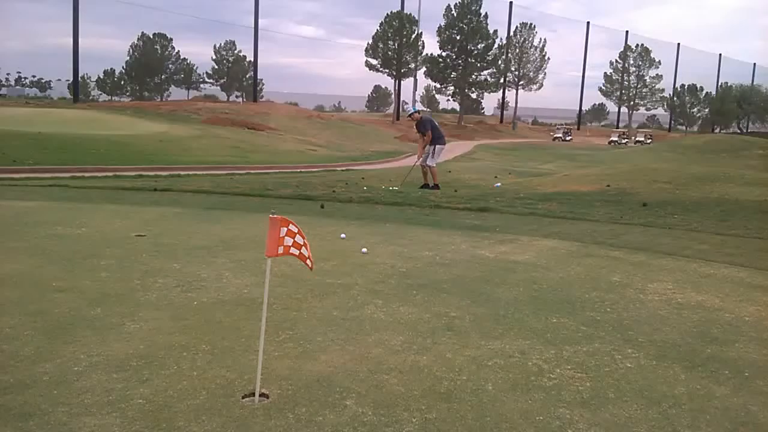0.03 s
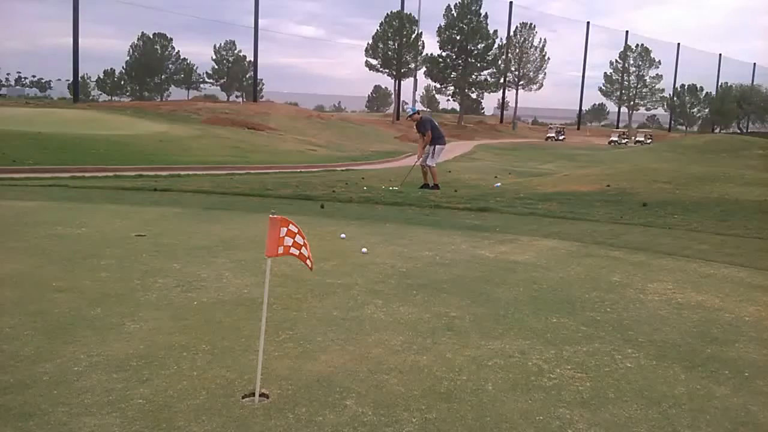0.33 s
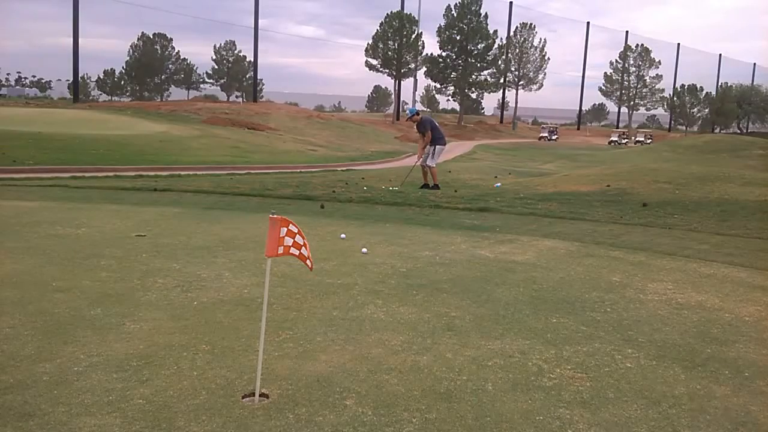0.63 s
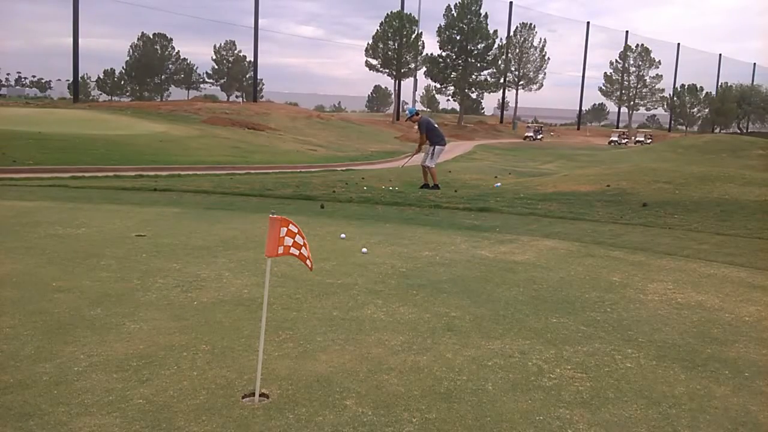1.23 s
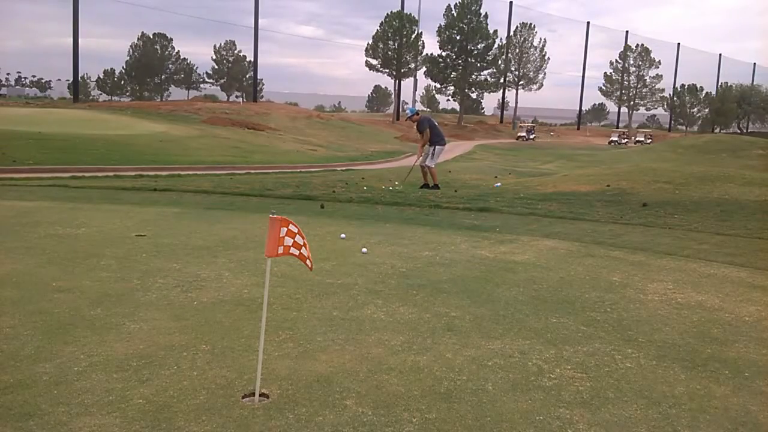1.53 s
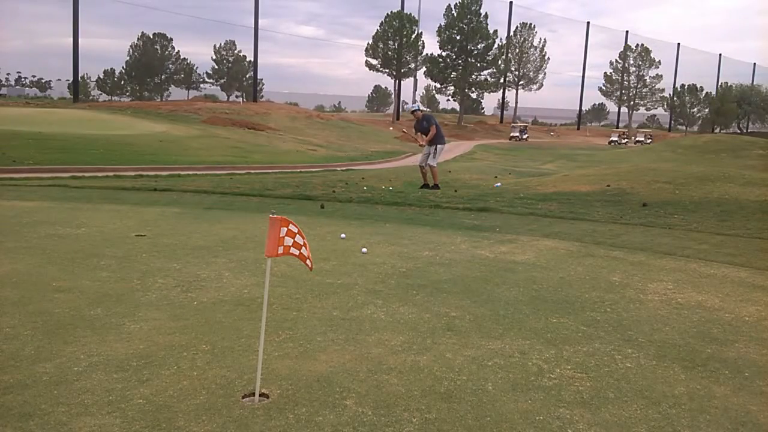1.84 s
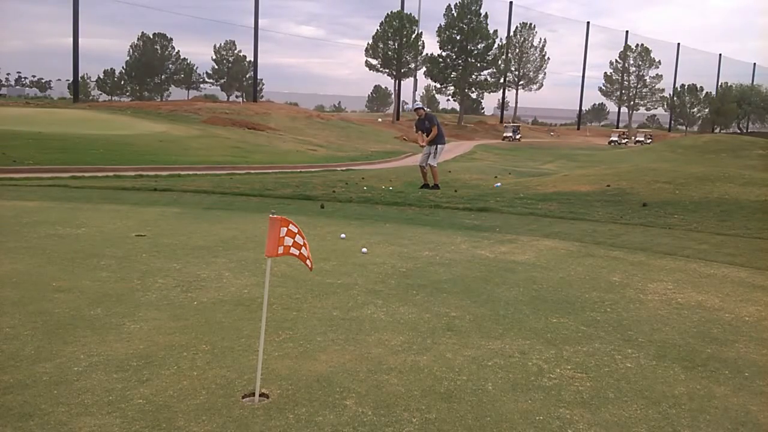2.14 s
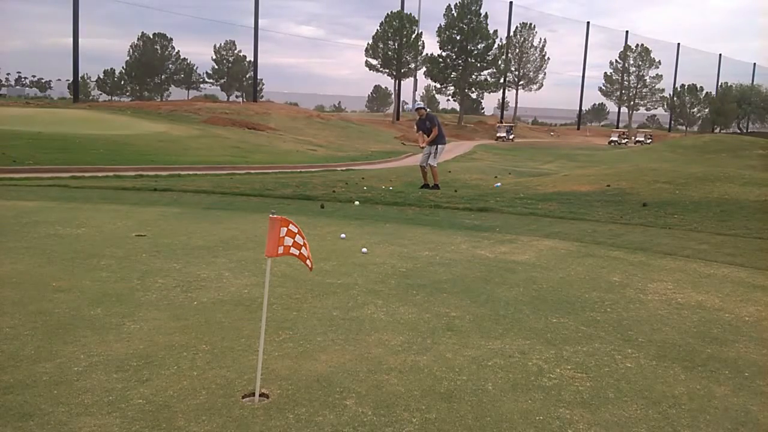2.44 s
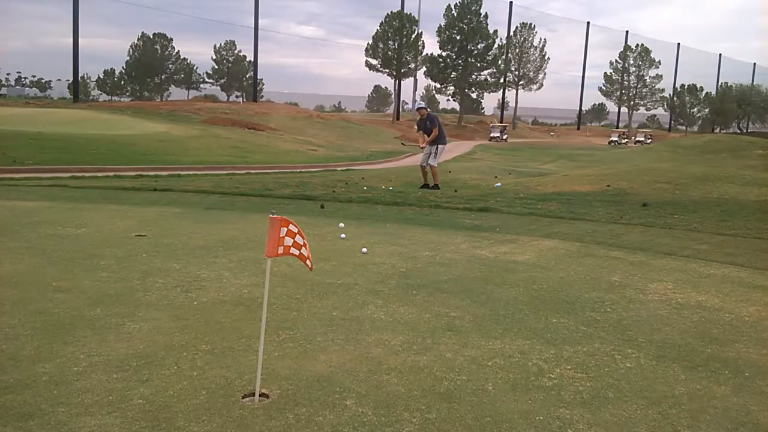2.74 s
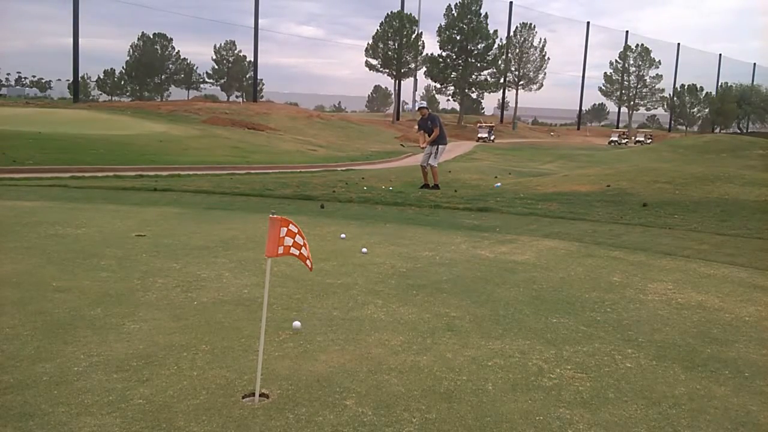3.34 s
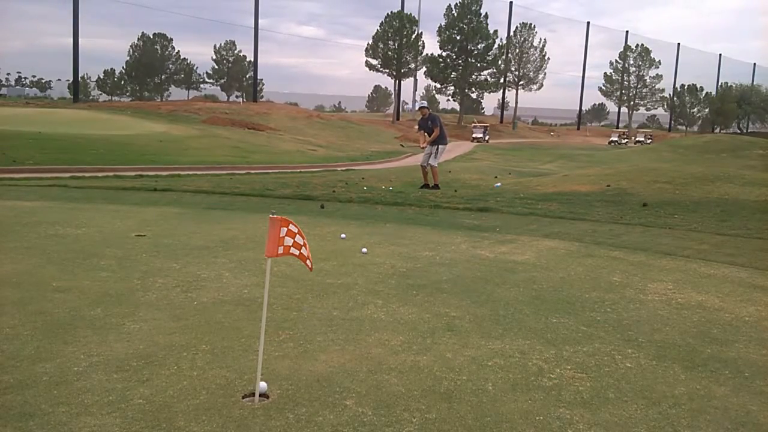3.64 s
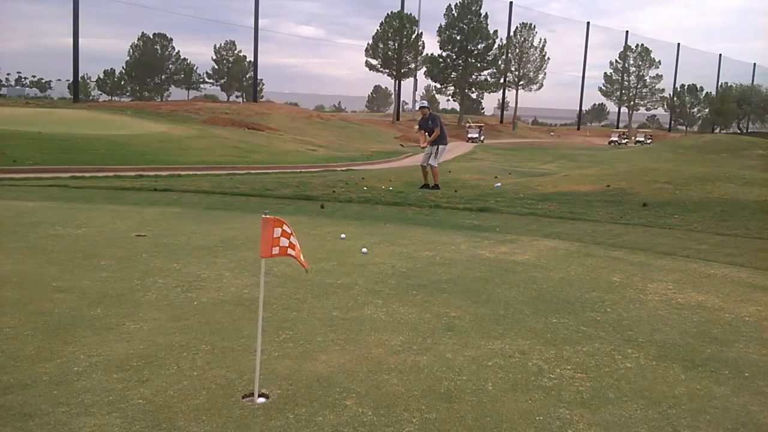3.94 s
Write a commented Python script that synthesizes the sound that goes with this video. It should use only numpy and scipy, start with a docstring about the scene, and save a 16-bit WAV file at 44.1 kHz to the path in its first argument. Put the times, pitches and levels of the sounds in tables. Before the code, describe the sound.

A golf ball hitting the flagstick and dropping into the hole ends a quiet outdoor stretch. First come light wind on the microphone, a far hush and a distant chip, then the close, briefly ringing rattle.

```python
"""A chip shot on a quiet golf course. Soft wind buffets the microphone throughout, growing a little,
over the even hush of far traffic and trees. At 1.63 s the club clicks on the ball, far off. A faint
tone and two swells of the hush follow. At 3.78 s the ball strikes the flagstick close by, rattles
between stick and rim, ringing both, and at 3.9 s drops into the cup, where turf dulls the treble."""
import sys
import numpy as np
from scipy import signal
from scipy.fft import rfft, irfft
from scipy.io import wavfile
from scipy.ndimage import uniform_filter1d

SR = 44100
rng = np.random.default_rng(int(sys.argv[2]) if len(sys.argv) > 2 else 0)


def unload_audio(sound):
    """Save the sound as a 16-bit wav file, at the path given as the first command line argument."""
    columns = np.transpose(np.atleast_2d(sound))
    # keep every value between -1 and 1, then stretch to whole-number steps
    steps = np.round(np.clip(columns, -1, 1) * 32767)
    wavfile.write(sys.argv[1], SR, steps.astype(np.int16))


N = 176400

# wind rumble spectrum: f/Hz, relative density/dB
RUMBLE_SPECTRUM = [(15, -37.5), (28, -9.5), (62, 2), (120, 1), (200, -8), (290, -18), (420, -29),
                   (700, -46.5), (2000, -83.5)]
# wind rumble envelope: t/s, level/dB
WIND_LEVELS = [(.1, -40), (.36, -36), (.62, -38), (.74, -34), (.8, -35), (.88, -32.5), (1.0, -37.5),
               (1.33, -36), (1.55, -40), (1.8, -36), (2.15, -33.5), (2.28, -34), (2.45, -36.5), (3.0, -32),
               (3.35, -30), (3.62, -34), (3.95, -28)]
# eddies on the microphone: t/s, relative level/dB, centre f/Hz
EDDY_THUMPS = [(0.245, -23.5, 212), (0.731, -22, 128), (0.741, -24.5, 117), (0.868, -23.5, 81),
               (0.882, -18.5, 81), (0.899, -21, 145), (1.094, -24, 130), (1.303, -30, 197),
               (1.334, -27, 93.5), (1.396, -25, 145), (1.701, -23.5, 95), (1.83, -21, 148),
               (1.863, -24, 121), (2.011, -21.5, 99), (2.292, -22.5, 106), (2.609, -26, 274),
               (2.667, -21.5, 159), (2.71, -20, 109), (2.763, -29.5, 232), (2.782, -26.5, 160),
               (2.83, -19.5, 162), (2.85, -23.5, 235), (2.88, -26.5, 101), (2.936, -25.5, 190),
               (2.955, -19.5, 90), (2.995, -18.5, 88), (3.025, -20.5, 128), (3.041, -23.5, 140),
               (3.083, -21, 202), (3.211, -24.5, 130), (3.306, -16.5, 146), (3.328, -16.5, 173),
               (3.333, -10.5, 203), (3.387, -19.5, 187), (3.419, -22.5, 124), (3.464, -14.5, 111),
               (3.542, -23.5, 206), (3.548, -19.5, 225), (3.701, -14, 144), (3.718, -19, 173),
               (3.773, -24, 215), (3.89, -13.5, 105.3), (3.902, -20, 255), (3.929, -15, 147),
               (3.953, -14.5, 185), (3.957, -19, 104)]
# distant hush spectrum: f/Hz, relative density/dB
HUSH_SPECTRUM = [(100, -12.5), (550, -1.5), (1000, 1.5), (1500, -1), (2000, -10.5), (2800, -17),
                 (4000, -19), (5300, -23.5), (7500, -32.5), (15500, -32.5)]
# swells of the hush: t/s, half width/s, level/dB
HUSH_SWELLS = [(2.166, 0.096, -64), (2.556, 0.24, -66.5)]
# club click spectrum: f/Hz, relative density/dB
CHIP_SPECTRUM = [(200, -4), (500, 5), (800, 4), (1700, 1), (2500, -12), (4200, -17), (8500, -31),
                 (10500, -52)]
# faint far tone: t/s, half width/s, f/Hz, level/dB
TONE_SWELL = (1.96, .06, 1453, -66)
# ball against stick and cup: t/s, relative level/dB, hardness as treble gain/dB
BALL_CONTACTS = [(3.7801, 2, -1), (3.7832, -2, 3), (3.7888, 3.5, -12), (3.7958, -7, 5.5),
                 (3.7980, -6.5, 14), (3.8060, -7, 10), (3.8110, -14, 14), (3.8205, -12, 7.5),
                 (3.8308, -6.5, -1.5), (3.8480, -8, -1), (3.9185, -6.5, -21.5), (3.9215, -16, 1),
                 (3.9355, -19.5, 5), (3.9435, -13, -0.5), (3.9505, -12, -10)]
# stick and cup modes: f/Hz, relative level/dB, T60/s
STICK_CUP_MODES = [(757, 2.5, .27), (1102, -4, .25), (1521, -4, .28), (853, -10, .22), (894, -10, .22),
                   (1135, -12, .2), (1546, -9, .2), (503, -7, .2), (720, -5, .08), (1390, -12, .22),
                   (1783, -16, .2), (2050, -15, .2), (2640, -22, .14), (2755, -16, .18), (2815, -17, .2),
                   (3385, -18, .12), (3475, -16, .12), (4385, -21, .11)]
# spectrum of a contact's crack and echo: f/Hz, relative density/dB
CONTACT_SPECTRUM = [(250, -17.5), (500, 1), (750, 1), (1050, -1), (1600, -5), (2000, -11), (2350, -13.5),
                    (2700, -8.5), (3150, -20), (3420, -8.5), (3900, -16), (4600, -17.5), (6200, -35.5),
                    (8700, -38.5), (11800, -55), (15000, -75)]

START_S, TOP_HZ = .072, 15750
FLUTTER_DB, FLUTTER_PER_S = 2.1, 32
EDDY_GAIN_DB, EDDY_WIDTH_CYCLES, EDDY_LOW_HZ = 2, .24, 34.7
HUSH_DB, HUSH_WANDER_DB, SWELL_HZ = -56.5, .25, 2025
CHIP_S, CHIP_GAIN_DB, SCATTER_GAIN_DB, SCATTER_T60_S = 1.6315, -23, -25, .04
RING_GAIN_DB, RING_ATTACK_S, TREBLE_HZ = -40.5, .0006, 2200
CRACK_GAIN_DB, CRACK_T60_S = -30.5, .028
HOLLOW_GAIN_DB, HOLLOW_T60_S, HOLLOW_TOP_HZ = -39.5, .18, 5230  # dense ringing of the hole
DROP_S, TURF_TOP_HZ = 3.9, 5200


def undb(db):
    """Decibels to gain."""
    return 10 ** (np.asarray(db) / 20)


def spectrum_gain(spectrum, size):
    """Gain per bin of a real FFT; (Hz, dB) points interpolated over log frequency."""
    hz, db = np.array(spectrum, float).T
    bin_hz = np.maximum(np.arange(size // 2 + 1) * SR / size, 1)
    return undb(np.interp(np.log(bin_hz), np.log(hz), db))


def noise(spectrum):
    """Noise of rms 1 with the given spectrum."""
    shaped = irfft(rfft(rng.standard_normal(N)) * spectrum_gain(spectrum, N), N)
    return shaped / shaped.std()


def colour(x, spectrum):
    """Minimum-phase filter with the given spectrum; white noise keeps its rms."""
    cepstrum = irfft(np.log(spectrum_gain(spectrum, 2048)))
    cepstrum[1:1024] *= 2  # fold onto positive time
    cepstrum[1025:] = 0
    response = irfft(np.exp(rfft(cepstrum)))
    return signal.fftconvolve(x, response / np.linalg.norm(response))[:len(x)]


def walk(steps_per_s):
    """Random held levels, smoothed twice; spread 1."""
    hold = max(int(SR / steps_per_s), 1)
    steps = rng.standard_normal(1024)[np.arange(N) // hold % 1024]
    smooth = uniform_filter1d(uniform_filter1d(steps, hold), hold)
    return smooth / smooth.std()


def fade(age_s, t60_s):
    """Silence before the blow, then exponential decay."""
    return (age_s >= 0) * np.exp(-np.log(1000) * np.maximum(age_s, 0) / t60_s)


def wind(t):
    """Fluttering rumble at the microphone; each strong eddy is about one swing of pressure."""
    level_db = np.interp(t, *np.array(WIND_LEVELS).T)
    rumble = noise(RUMBLE_SPECTRUM) * undb(level_db + FLUTTER_DB * walk(FLUTTER_PER_S))
    thumps = np.zeros(N)
    for at_s, db, hz in EDDY_THUMPS:
        near = np.abs(t - at_s) < .05
        cycles = (t[near] - at_s) * hz
        swing = np.sin(2 * np.pi * (cycles + rng.random()))
        thumps[near] += undb(db + EDDY_GAIN_DB) * swing / np.cosh(cycles / EDDY_WIDTH_CYCLES)
    low_cut = signal.butter(2, EDDY_LOW_HZ, "high", fs=SR, output="sos")
    return rumble + signal.sosfilt(low_cut, thumps)


def distant_hush(t):
    """Even noise of far traffic and trees, with faint swells."""
    hush = noise(HUSH_SPECTRUM) * undb(HUSH_DB + HUSH_WANDER_DB * walk(steps_per_s=13))
    band = noise([(SWELL_HZ / 2, -12), (SWELL_HZ, 0), (SWELL_HZ * 2, -20), (TOP_HZ, -60)])
    swells = sum(undb(db) * np.exp(-((t - at_s) / width_s) ** 2) for at_s, width_s, db in HUSH_SWELLS)
    return hush + band * swells


def chip(t):
    """One dry knock of club on ball, scattered briefly by the ground."""
    knock = np.zeros(N)
    knock[int(CHIP_S * SR)] = 1
    scatter = undb(SCATTER_GAIN_DB) * rng.standard_normal(N) * fade(t - CHIP_S, SCATTER_T60_S)
    return undb(CHIP_GAIN_DB) * colour(knock + scatter, CHIP_SPECTRUM)


def far_tone(t):
    """A brief, slightly wavering tone in the distant hush."""
    at_s, width_s, hz, db = TONE_SWELL
    wavering_hz = hz * (1 + .005 * walk(steps_per_s=60))
    phase = 2 * np.pi * np.cumsum(wavering_hz) / SR
    return undb(db) * np.sqrt(2) * np.sin(phase) * np.exp(-((t - at_s) / width_s) ** 2)


def stick_and_cup_ring(age_s):
    """Struck stick and cup: decaying modes at random phases."""
    ring = sum(undb(db) * np.sin(2 * np.pi * (hz * age_s + rng.random())) * fade(age_s, t60_s)
               for hz, db, t60_s in STICK_CUP_MODES)
    return undb(RING_GAIN_DB) * ring * np.minimum(age_s / RING_ATTACK_S, 1)


def ball_in_cup(t):
    """Each contact rings stick and cup, cracks and echoes in the hole; harder ones are brighter."""
    treble_pass = signal.butter(2, TREBLE_HZ, "high", fs=SR, output="sos")
    hollow_pass = signal.butter(4, HOLLOW_TOP_HZ, fs=SR, output="sos")
    turf_pass = signal.butter(4, TURF_TOP_HZ, fs=SR, output="sos")
    rattle = np.zeros(N)
    for at_s, db, treble_db in BALL_CONTACTS:
        after = t >= at_s
        age_s = t[after] - at_s
        ring = stick_and_cup_ring(age_s)
        white = rng.standard_normal((2, N))[:, after]
        crack = undb(CRACK_GAIN_DB) * white[0] * fade(age_s, CRACK_T60_S)
        hollow = undb(HOLLOW_GAIN_DB) * signal.sosfilt(hollow_pass, white[1] * fade(age_s, HOLLOW_T60_S))
        hit = ring + colour(crack + hollow, CONTACT_SPECTRUM)
        if at_s > DROP_S:  # down in the cup: turf shades the top
            hit = signal.sosfilt(turf_pass, hit)
        treble = signal.sosfiltfilt(treble_pass, hit)
        rattle[after] += undb(db) * (hit + (undb(treble_db) - 1) * treble)
    return rattle


def scene():
    """All sources at one microphone beside the green."""
    t = np.arange(N) / SR
    return (wind(t) + distant_hush(t) + chip(t) + far_tone(t) + ball_in_cup(t))[None]


def record(dry):
    """Brief silence, 3 ms fade-in, steep top cut."""
    fade_in = np.clip((np.arange(N) / SR - START_S) / .003, 0, 1)
    top_cut = signal.ellip(10, .1, 80, TOP_HZ, fs=SR, output="sos")
    return signal.sosfilt(top_cut, dry * fade_in)


dry = scene()
out = record(dry)
unload_audio(out)
```